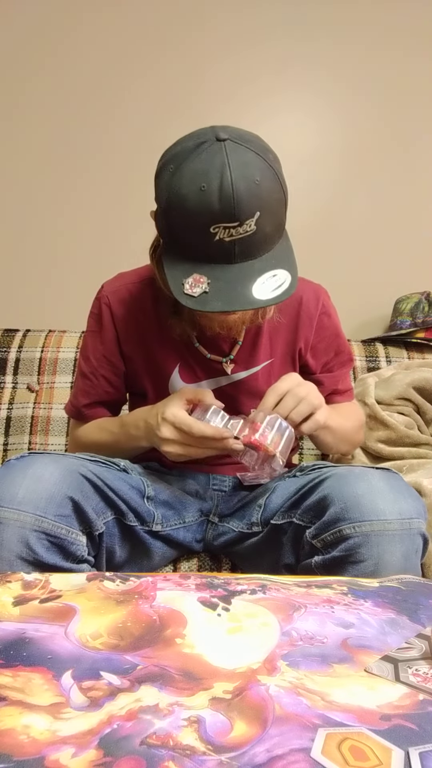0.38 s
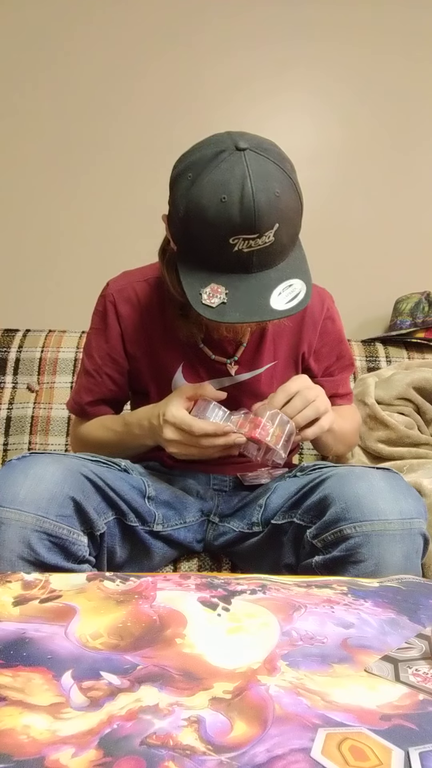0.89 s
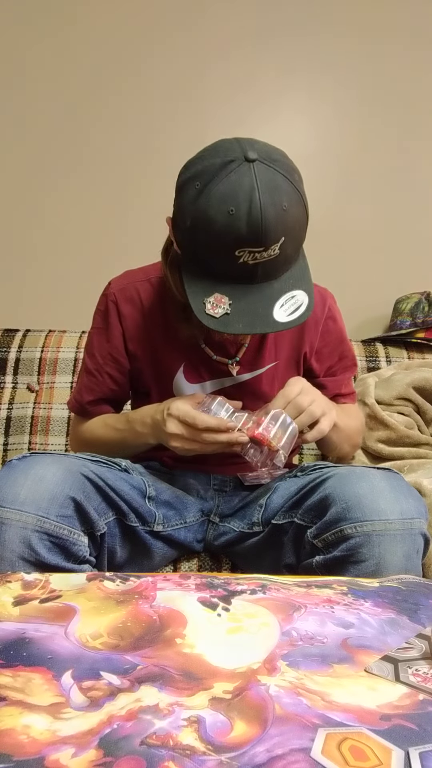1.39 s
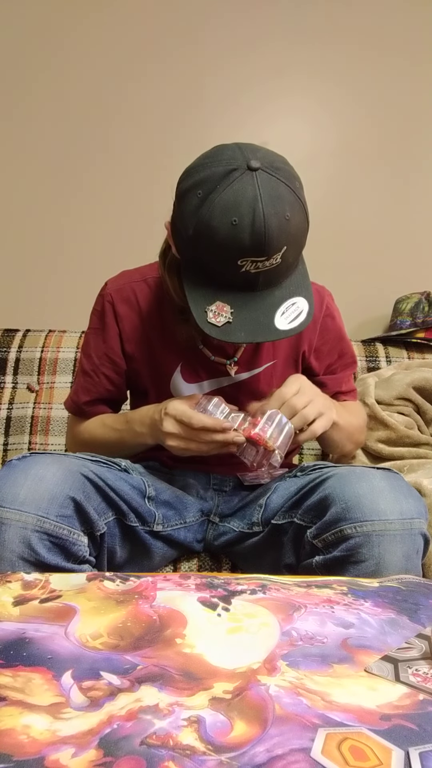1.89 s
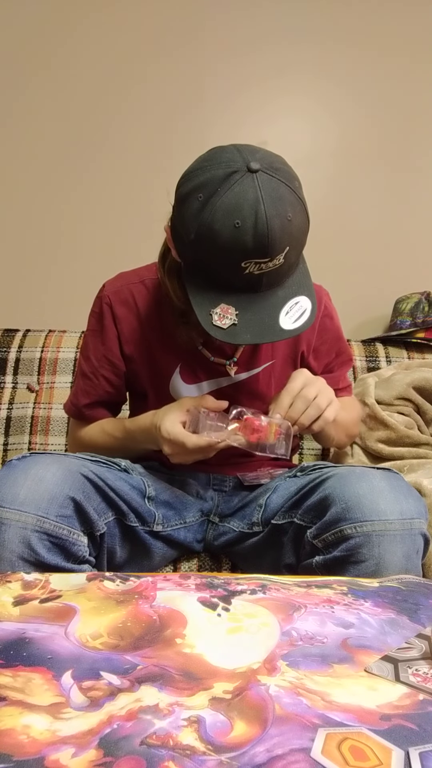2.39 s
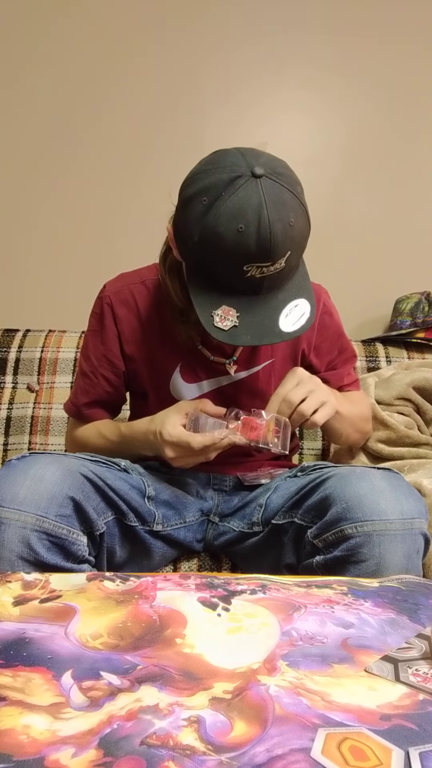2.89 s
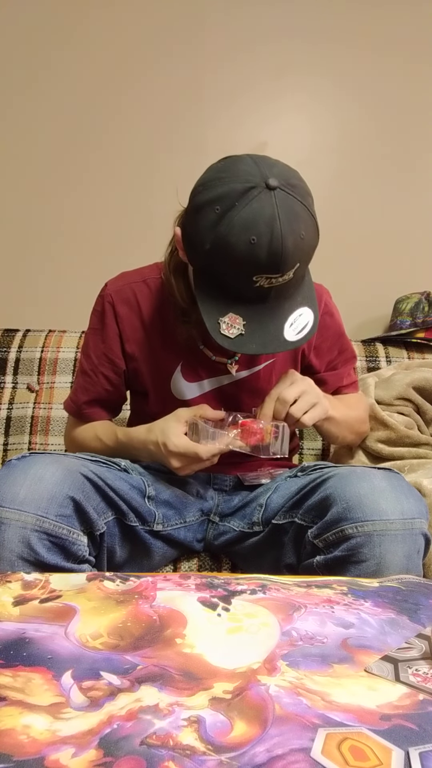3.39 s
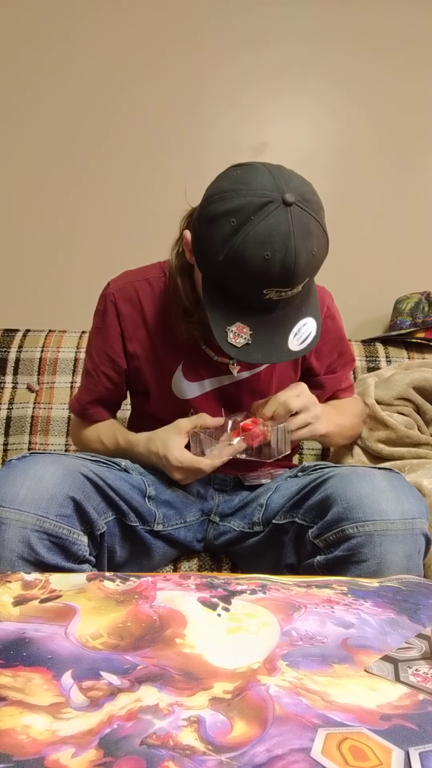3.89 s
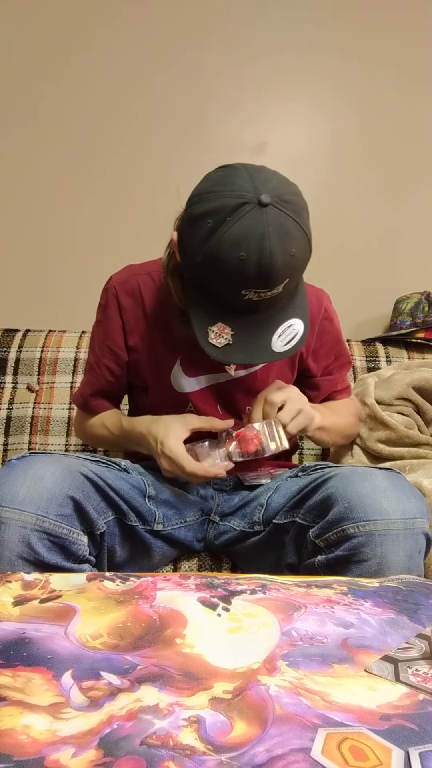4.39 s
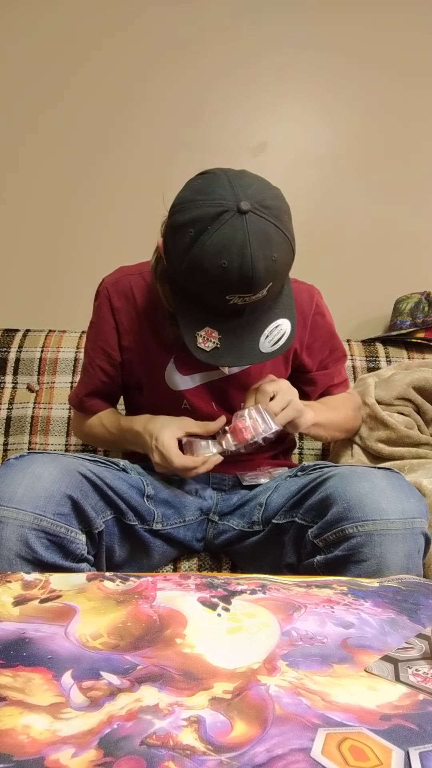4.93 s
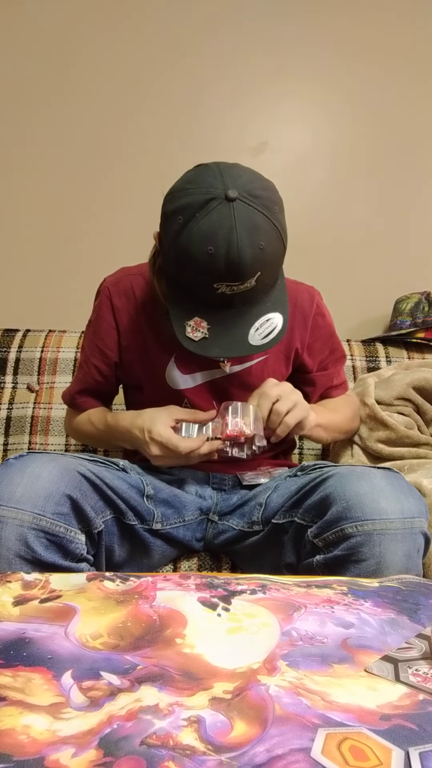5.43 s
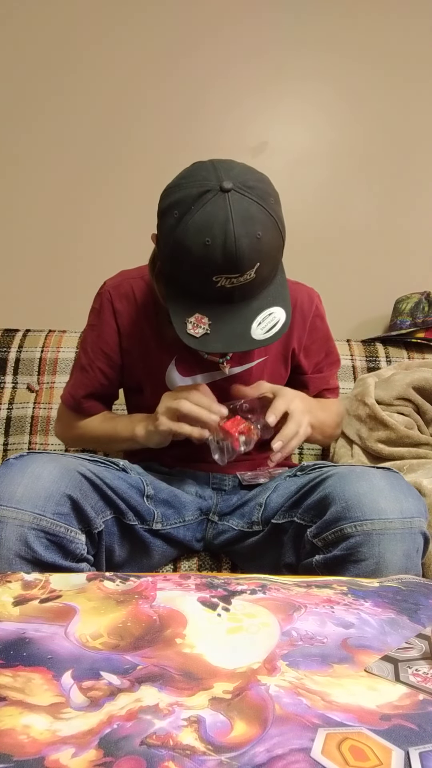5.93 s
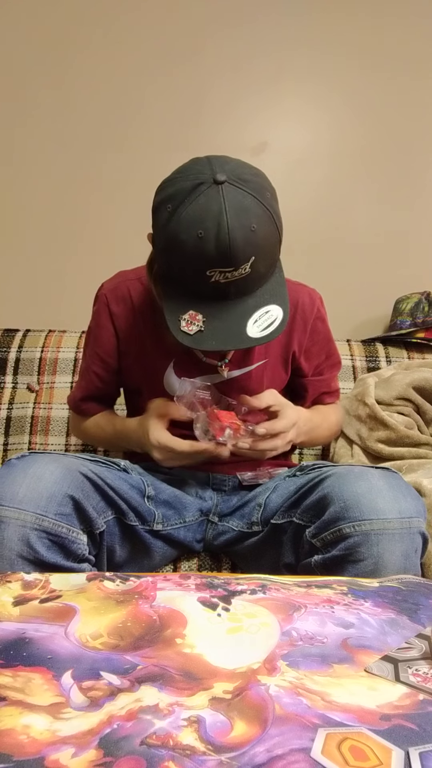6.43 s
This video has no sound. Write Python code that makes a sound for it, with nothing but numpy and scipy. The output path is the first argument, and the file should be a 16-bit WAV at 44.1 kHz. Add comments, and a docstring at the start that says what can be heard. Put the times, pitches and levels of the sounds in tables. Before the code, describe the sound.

A stiff, clear plastic pack is handled about a metre from a phone in a small, quiet room with short close reflections. From 0 to 0.7 s there are faint rustles, little dull ticks and a barely audible squeak of skin on film. A crisp cluster of snaps lands at 0.8 s, then it is sparse until light pops around 1.4 to 2.2 s, sharpest near 1.7 and 1.9. After a lull, a firmer pop comes at 2.95, followed by a quick run of small crackles to 3.4. From 3.7 the snaps grow brighter and harder, with strong ones near 4.24 and 4.7. Between 4.9 and 5.2 s comes a dense loud crunch, ending in the biggest pop. Smaller crackles fade by 5.6, then soft hollow ticks and rustles continue, with one last clear click at 6.55. Faint wavering hum and hiss persist throughout.

```python
"""Small quiet room: fingers pick at a stiff, clear plastic blister pack, a metre from a phone.
Each buckle of the shell snaps: a dent thuds, a panel rings, the crease cracks and ticks.
Sliding strokes make the film rustle from random slips; a few faint squeaks are swelling noise bands.
Near walls answer after a short gap, then a diffuse tail; a slightly wavering hum and a hiss lie underneath."""
import sys
import numpy as np
from scipy import signal
from scipy.fft import rfft, irfft, next_fast_len
from scipy.io import wavfile
from scipy.ndimage import uniform_filter1d, minimum_filter1d, map_coordinates

SR = 44100
rng = np.random.default_rng(int(sys.argv[2]) if len(sys.argv) > 2 else 0)


def dump_mix(stems):
    """Bounce the given channels to the path in sys.argv[1] as a 16-bit WAV at rate SR."""
    frames = np.atleast_2d(stems).T  # one column per channel
    limited = np.clip(frames, -1, 1)  # hard clip at full scale
    pcm = np.round(limited * 32767).astype(np.int16)
    wavfile.write(sys.argv[1], SR, pcm)


def gain_from_db(level_db):
    """Convert decibel levels to linear amplitude factors (20 dB per decade)."""
    decades = np.asarray(level_db, float) / 20
    return 10 ** decades


N = 288855

# First echoes off the near walls. Each row: delay in seconds, level in dB.
WALL_ECHOES = [(.0077, -10.5), (.0135, -14.5), (.018, -13.5), (.023, -28.5)]
# Film sliding under the fingers. Each row: start in seconds, length in seconds,
# dull rustle in relative dB, bright rustle in relative dB.
FILM_STROKES = [(-0.02, 0.072, -56, -58), (0.087, 0.14, -63, -65), (0.155, .16, -53.5, -47),
                (0.321, 0.14, -59.5, -58), (0.498, .1, -55, -55), (0.593, 0.24, -62, -57.5),
                (0.938, 0.056, -66, -64), (1.055, .12, -74, -73), (1.587, 0.14, -56, -66),
                (2.132, .18, -54.5, -57), (2.397, 0.11, -59, -53.5), (2.527, 0.025, -54, -57),
                (2.916, 0.022, -48.5, -62), (3.178, 0.29, -50, -57.5), (3.36, 0.049, -67, -53),
                (3.533, 0.22, -53.5, -61.5), (3.798, 0.082, -44, -55), (4.039, 0.25, -44.5, -37.5),
                (4.474, 0.19, -60, -57), (4.622, 0.054, -55, -56.5), (4.822, 0.069, -43, -41),
                (4.881, 0.19, -46, -40), (5.004, 0.036, -34.5, -34.5), (5.068, 0.11, -33, -31.5),
                (5.166, 0.04, -31.5, -35), (5.35, .06, -60.5, -43.5), (5.388, .12, -47.5, -41),
                (5.535, 0.037, -53, -63), (5.659, 0.029, -56.5, -63), (5.705, 0.095, -56, -57),
                (5.893, 0.041, -56, -58.5), (5.948, 0.094, -52.5, -65.5), (6.041, 0.067, -58.5, -54.5),
                (6.09, 0.087, -57, -58), (6.166, 0.1, -58, -55.5), (6.3, 0.041, -62, -69),
                (6.403, 0.1, -55, -56)]


def snaps():
    """Each buckle rings three dent and two panel modes; shell thud, crack and tick are short noise bursts."""
    # Buckles. Each row: time in seconds, snap reference level in dB, dent in dB re snap,
    # panel pitch in Hz, crack in dB re snap.
    buckles = [(0.169, -38, 1.5, 2700, -14), (0.387, -46, 7, 1920, -22), (0.499, -47, 0, 1670, -9),
               (0.541, -49, 8, 1910, -6), (0.788, -26.5, -20, 2140, -5.5), (0.795, -25.5, -22, 2300, -8.5),
               (0.799, -21.5, -17, 3380, -8), (1.205, -49, 6.5, 2030, -22), (1.368, -32.5, 1, 2110, -18),
               (1.377, -42, -11, 1630, -3), (1.446, -42.5, 8.5, 1910, -17), (1.561, -33.5, -9.5, 2700, -8),
               (1.6, -52.5, -6, 2650, 6), (1.62, -43.5, 0, 1540, -8), (1.683, -26, -8.5, 2780, -2),
               (1.845, -37.5, 2.5, 1990, -22), (1.876, -54, -4, 2000, 7.5), (1.889, -29.5, -15.5, 4430, 0),
               (1.987, -38.5, -10, 3630, -12), (2.0, -38, 4, 2510, -12), (2.107, -44, 0.5, 2100, -10),
               (2.144, -34.5, -2.5, 2170, -9), (2.158, -39.5, -7, 3580, -1.5), (2.242, -51.5, -13, 3630, 0),
               (2.41, -52, -19, 2520, 3.5), (2.46, -42, -4.5, 3340, -7.5), (2.536, -48.5, -6, 2330, -11),
               (2.701, -56, -13, 1690, 9), (2.944, -23.5, 1, 2570, -31), (2.951, -30.5, -7, 2800, -9),
               (3.01, -38.5, 0, 2250, -5), (3.199, -40, -4, 2130, -28), (3.217, -37, -11, 2650, -30),
               (3.227, -42, -7, 2240, -29), (3.267, -39.5, -5, 1760, -22), (3.286, -38, -9, 1610, -25),
               (3.302, -34, -8, 2360, -23), (3.317, -33, -6, 2400, -20), (3.343, -45.5, 0.5, 2340, -24),
               (3.369, -41.5, 2.5, 2550, -0.5), (3.387, -34, -13, 4140, -21), (3.471, -55, -5, 3920, 11),
               (3.702, -29.5, 2, 3690, 1.1), (3.738, -22, -4, 4300, -7), (3.746, -23.5, -6, 2340, -15),
               (3.827, -32.5, -13, 3950, -9), (3.858, -19, -19, 3490, -7.5), (4.017, -36.5, -9, 3400, -1.1),
               (4.043, -34.5, -8.5, 4060, 0.5), (4.074, -36, -23, 4300, 7.5), (4.145, -23, -7, 2530, -4),
               (4.159, -25.5, -2, 1850, -3.5), (4.186, -21.5, -28, 4560, -2),
               (4.194, -34.5, -10, 4360, 2.5), (4.236, -14, -6.5, 4240, -8), (4.322, -33, -13, 2780, -5.5),
               (4.335, -26.5, -8.5, 3520, -7.5), (4.513, -28, -25, 3400, -4.5),
               (4.624, -32, -11, 3600, -14), (4.685, -15, -7, 3640, -6.5), (4.717, -24.5, -5, 2510, -0.5),
               (4.788, -28.5, -27, 2510, -1.5), (4.797, -24.5, -6, 2440, -3), (4.828, -32.5, 0, 2527, -7),
               (4.835, -22, -6.5, 2690, -2), (4.903, -29.5, 1, 1800, -19.5),
               (4.914, -36.5, -3.5, 3030, -13), (4.935, -6.5, -21, 2350, -6.5),
               (4.942, -15.5, -8, 2600, -18), (4.99, -11.5, -3, 3270, -2.5), (5.086, -20, 1, 2580, -25.5),
               (5.102, -13.5, -6, 2870, -21), (5.119, -7.5, -13, 3690, -6), (5.132, -17, -20, 2877, -2),
               (5.176, -18.5, -10, 2860, -1.5), (5.2, 9.5, -13.5, 2750, -18),
               (5.351, -30.5, -28, 1800, 1.5), (5.411, -30, -3, 3840, -8.5), (5.446, -25, -12.5, 3460, -6),
               (5.545, -39, -6, 2210, -8), (5.743, -49.5, 12, 1490, -5), (5.757, -46.5, 9.5, 1520, -25),
               (5.801, -51, 9.5, 1530, -20.5), (5.889, -42, -3.5, 1940, -13), (5.961, -38.5, 4, 2630, -32),
               (5.996, -38, -23, 1970, -11.5), (6.123, -48, 1, 2180, -0.5), (6.438, -46, -11, 1550, -10),
               (6.473, -42.5, 1.5, 1490, -22), (6.546, -24, 0, 2500, -8)]
    # Dent pitch as the grip squeezes and frees the shell. Each row: time in seconds, pitch in Hz.
    grip = [(0.15, 800), (0.79, 700), (1.2, 875), (1.45, 880), (1.56, 775), (2.1, 740), (2.5, 1050),
            (2.94, 810), (3.32, 750), (3.37, 510), (3.75, 500), (3.85, 1050), (4.3, 1020), (4.63, 880),
            (4.68, 500), (4.84, 630), (4.9, 1100), (5.1, 1060), (5.2, 1310), (5.41, 790), (6.0, 770),
            (6.47, 596), (6.54, 900)]
    # Thin edges flicking free, treble only. Each row: time in seconds, level in dB.
    flicks = [(1.683, -31), (2.701, -50), (3.369, -34), (3.702, -35), (3.858, -28.5), (4.145, -36),
              (4.186, -33.5), (4.236, -28), (4.685, -29), (4.788, -34), (4.828, -35.5), (4.935, -17),
              (5.064, -51), (5.119, -20.5), (5.351, -23)]
    # Thud of a 2500 Hz panel. Each row: frequency in Hz, relative level in dB per Hz.
    thud_spectrum = [(300, -11), (700, -1.5), (1200, -0.5), (1700, 1.5), (2900, -5.5), (3800, -8.5),
                     (6000, -33.5)]
    # Crease crack. Each row: frequency in Hz, relative level in dB per Hz.
    crack_spectrum = [(2500, -16.5), (4000, -14.5), (5500, -10), (7000, -7.5), (8000, -15.5), (9000, -58.5)]
    # Crease tick and edge flick. Each row: frequency in Hz, relative level in dB per Hz.
    tick_spectrum = [(7000, -28), (8500, 1.5), (11000, 4), (13000, -2), (15500, 1.5), (17000, -34)]
    dent_t60_s, panel_t60_s = 0.021, 0.0065
    tick_re_crack_db = -15

    columns = np.vstack([buckles, faint_snaps()]).T[:, :, None]
    time_s, snap_db, dent_re_snap_db, panel_hz, crack_re_snap_db = columns
    dent_db = snap_db + dent_re_snap_db
    crack_db = snap_db + crack_re_snap_db
    dent_hz = np.interp(time_s, *np.transpose(grip))
    t = np.arange(2048) / SR

    def ring(hz, t60_s, rise_s):
        """One decaying mode with a soft onset."""
        return np.sin(2 * np.pi * hz * t) * gain_from_db(-60 * t / t60_s) * (1 - np.exp(-t / rise_s))

    dent = gain_from_db(dent_db) * ring(dent_hz, dent_t60_s, 0.00084)
    dent += gain_from_db(dent_db - 10.5) * ring(0.578 * dent_hz, dent_t60_s, 0.0015)  # wider wall
    dent += gain_from_db(dent_db - 6) * ring(1.7 * dent_hz, dent_t60_s / 2, 0.00089)  # overtone
    panel = gain_from_db(snap_db - 1.5) * ring(panel_hz, panel_t60_s, 0.00034)
    panel += gain_from_db(snap_db - 9.5) * ring(0.65 * panel_hz, panel_t60_s, 0.0014)  # lower partner
    # higher-pitched panels thud higher
    thud = burst(thud_spectrum, snap_db - 13, t, t60_s=0.022, rise_s=0.00058, stretch=panel_hz / 2500)
    crack = burst(crack_spectrum, crack_db, t, t60_s=0.012, rise_s=0.00036)
    tick = burst(tick_spectrum, crack_db + tick_re_crack_db, t, t60_s=0.012, rise_s=0.0003)

    track = np.zeros(N)
    direct, all_round = dent + panel + thud + crack + tick
    add(track, direct, all_round, time_s[:, 0] + 0.0003)
    flick_s, flick_db = np.transpose(flicks)
    direct, all_round = burst(tick_spectrum, flick_db[:, None], t, t60_s=0.005, rise_s=0.0003)
    add(track, direct, all_round, flick_s)
    return track


def faint_snaps():
    """One small chance buckle around each stroke, as rows like the large ones."""
    level_re_dull_db, spread_db, typical_panel_hz = -3, 5, 2300
    start_s, length_s, dull_db, _ = np.transpose(FILM_STROKES)
    where, size, dent, panel, crack = rng.standard_normal((len(start_s), 5)).T
    time_s = np.clip(start_s + length_s * (0.5 + 0.22 * where), 0, None)
    snap_db = dull_db + level_re_dull_db + spread_db * size
    panel_hz = typical_panel_hz * np.exp(0.25 * panel)
    return np.transpose([time_s, snap_db, -1.5 + 3 * dent, panel_hz, -9 + 6 * crack])


def burst(spectrum, db, t, t60_s, rise_s, stretch=1):
    """A noisy burst, and one smooth click of the same energy: its colour averaged over all directions."""
    def colour(hz):
        return gain_from_db(along(spectrum, hz / stretch + 0 * db))  # 0 * db: one row per burst

    shape = gain_from_db(-60 * t / t60_s) * (1 - np.exp(-t / rise_s))
    noise = filtered(rng.standard_normal((len(db), len(t))), colour)
    click = filtered(np.arange(len(t)) == 100, colour)
    noise *= shape / np.std(noise, axis=1, keepdims=True)
    click *= np.linalg.norm(shape) / np.linalg.norm(click, axis=1, keepdims=True)
    return gain_from_db(db) * np.array([noise, click])


def rustle():
    """Slips excite the hollow of the shell and hiss off the film; the room smears them."""
    # Resonances of the hollow. Each row: centre in Hz, width in Hz, level in dB.
    hollow_modes = [(513, 430, 3), (846, 646, 8.5), (1156, 570, 6.5)]
    # Film hiss. Each row: frequency in Hz, relative level in dB per Hz.
    hiss_spectrum = [(700, -12.5), (1300, 1.5), (2500, 5.5), (4500, 0.5), (7300, -1), (8500, -19.5),
                     (15500, -15), (16500, -50)]

    def hollow(hz):
        """Resonators summed with alternating sign."""
        total = 0
        for k, (centre_hz, width_hz, db) in enumerate(hollow_modes):
            damping = 1j * hz * width_hz
            total = total + (-1) ** k * gain_from_db(db) * damping / (centre_hz ** 2 - hz ** 2 + damping)
        return total

    dull_gain, bright_gain = strokes()
    dull = gain_from_db(-6) * dull_gain * unit(filtered(grit(1500), hollow))
    bright = gain_from_db(-9) * bright_gain * unit(filtered(grit(2500), lambda hz: gain_from_db(along(hiss_spectrum, hz))))
    step = SR // 5  # each piece gets its own room tail
    pieces = np.pad(dull + bright, (0, -N % step)).reshape(-1, step)
    track = np.zeros(N)
    add(track, pieces, pieces, np.arange(len(pieces)) * step / SR)
    return track


def strokes():
    """Dull and bright strength of the sliding: every stroke swells and fades by the same law."""
    peak, sharpness = 0.34, 1.5  # peak as a share of stroke length
    t = np.arange(N) / SR
    gains = np.zeros((2, N))
    for start_s, length_s, *db in FILM_STROKES:
        u = (t - start_s) / length_s
        swell = np.clip(np.minimum(u / peak, (1 - u) / (1 - peak)), 0, 1)
        gains += gain_from_db(db)[:, None] * np.sin(np.pi / 2 * swell) ** sharpness
    return gains


def grit(rate_hz):
    """Tiny slips of the film: dense ticks of random timing and uneven size."""
    slips = rng.random(N) < rate_hz / SR
    return slips * rng.standard_normal(N) * gain_from_db(3 * rng.standard_normal(N))


def squeaks():
    """Skin slipping on the film: faint, fuzzy tones (narrow noise bands) that swell and fade."""
    # Each row: start in seconds, end in seconds, centre in Hz, level before the swell in dB rms.
    slips = [(.01, 0.08, 1590, -68.5), (0.632, 0.72, 1930, -61), (0.736, 0.795, 2150, -63.5)]
    t = np.arange(N) / SR
    track = np.zeros(N)
    for start_s, end_s, centre_hz, db in slips:
        swell = np.sin(np.pi * np.clip((t - start_s) / (end_s - start_s), 0, 1))
        tone = filtered(rng.standard_normal(N), lambda hz: np.exp(-((hz - centre_hz) / 130) ** 2))
        track += gain_from_db(db) * swell * unit(tone)
    return track


def add(track, direct, all_round, times_s):
    """Play each sound at its time: straight, off the near walls, and from all sides in the room's tail."""
    wet = signal.fftconvolve(all_round, rooms(len(direct)), axes=1)
    for delay_s, db in [(0.0007, 0.0038)] + WALL_ECHOES:  # straight path first
        wet[:, round(delay_s * SR):][:, :direct.shape[1]] += gain_from_db(db) * direct
    for time_s, row in zip(times_s, wet):
        part = track[round(time_s * SR):][:len(row)]
        part += row[:len(part)]


def rooms(count):
    """A silent gap, dense echoes, then a diffuse tail: decaying noise, drawn anew for each sound."""
    # Each row: frequency in Hz, t60 in seconds, tail level in dB.
    decay = [(300, 0.42, -9.5), (800, 0.44, -5.5), (2090, 0.3, -3), (5550, 0.3, -5.5), (7650, 0.22, -5),
             (9000, 0.24, -5.5), (15000, 0.21, -3.5)]
    length, build_s = 18000, 0.0035
    dense_s, dense_db = 0.051, 3  # farther walls: rises by dense_db until dense_s, then drops back
    hz, t, z = signal.stft(rng.standard_normal((count, length)), SR, nperseg=256)
    band_hz, band_t60_s, band_db = np.transpose(decay)
    t60_s = along(np.transpose([band_hz, band_t60_s]), hz)[:, None]
    db = along(np.transpose([band_hz, band_db]), hz)[:, None]
    fullness_db = dense_db * (np.clip(t / dense_s, 0, 1) * (t < dense_s) - 0.5)
    z = z * gain_from_db(db + fullness_db - 60 * t / t60_s)
    tail = signal.istft(z, SR, nperseg=256)[1][:, :length]
    late_s = np.clip(np.arange(length) / SR - WALL_ECHOES[0][0], 0, None)
    return tail * (1 - np.exp(-late_s / build_s)) / np.sqrt(SR / 60)


def room_tone():
    """Smooth broad noise, and a mains hum that wavers a little in level and phase."""
    # Room tone and hiss. Each row: frequency in Hz, relative level in dB per Hz.
    air_spectrum = [(20, -17.5), (60, -10), (150, -6), (320, -8), (550, -12), (800, -16.5), (1300, -19.5),
                    (3800, -23), (7500, -26), (15500, -28.5), (16300, -63.5)]
    # Each row: frequency in Hz, mean level in dB rms.
    hum_tones = [(120, -84), (240, -67.5)]
    air_db = -66.5  # rms above 300 Hz
    air = filtered(rng.standard_normal(N), lambda hz: gain_from_db(along(air_spectrum, hz)))
    air *= gain_from_db(air_db) / np.std(filtered(air, lambda hz: hz > 300))
    t = np.arange(N) / SR
    hum = np.zeros(N)
    for hz, db in hum_tones:
        level = gain_from_db(db + 1.2 * wobble(8.5)) * np.sqrt(2)
        hum += level * np.sin(2 * np.pi * hz * t + 0.37 * wobble(4))
    return air + hum


def unit(x):
    """Scale to rms 1."""
    return x / np.sqrt(np.mean(x ** 2) + 1e-20)


def along(points, hz):
    """(Hz, value) points read on a log frequency axis."""
    f, v = np.transpose(points)
    return np.interp(np.log(hz + 1), np.log(f + 1), v)


def wobble(rate_hz):
    """A smooth random curve, rate_hz knots a second."""
    knots = rng.standard_normal(int(N * rate_hz / SR) + 4)
    return map_coordinates(knots, [np.arange(N) * rate_hz / SR])


def filtered(x, response):
    """x times a response of frequency."""
    m = next_fast_len(x.shape[-1] + 8192)
    spectrum = rfft(x, m) * response(np.fft.rfftfreq(m, 1 / SR))
    return irfft(spectrum, m)[..., :x.shape[-1]]


def scene():
    """The small pack radiates little bass, hence the high-pass; the room tone lies under it."""
    high_pass = signal.butter(N=4, Wn=345, btype="high", fs=SR, output="sos")
    pack = signal.sosfilt(high_pass, snaps() + rustle() + squeaks())
    return (pack + room_tone())[None]


def low_pass(x):
    """Removes everything above the highest recorded frequency."""
    return signal.sosfilt(signal.butter(12, 16990, fs=SR, output="sos"), x)


def record(dry):
    """Slow gain control turns down loud passages and what follows; a fast limiter holds the highest peaks."""
    memory_s, threshold_db, slope, ceiling = 0.6, -38.5, 0.2, 0.71
    keep = np.exp(-1 / (memory_s * SR))
    power = signal.lfilter([1 - keep], [1, -keep], dry ** 2)
    loud_db = 10 * np.log10(power + 1e-12)
    steady = dry * gain_from_db(-slope * np.clip(loud_db - threshold_db, 0, None))
    peak_gain = np.minimum(1, ceiling / (np.abs(steady) + 1e-9))
    held_gain = minimum_filter1d(peak_gain, size=181)  # about 2 ms either side
    mix = steady * uniform_filter1d(held_gain, size=91)
    return low_pass(mix)


dry = scene()
out = record(dry)
dump_mix(out)
```